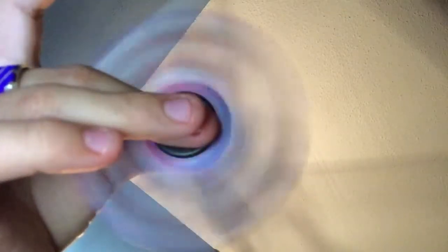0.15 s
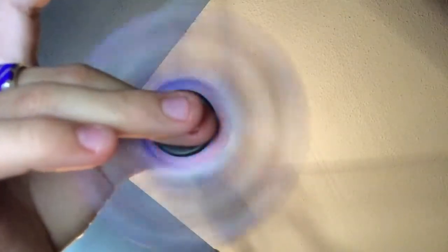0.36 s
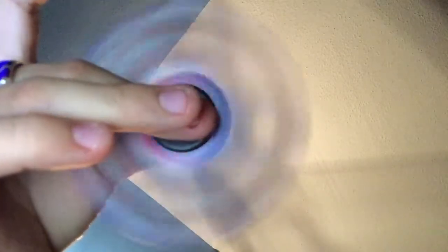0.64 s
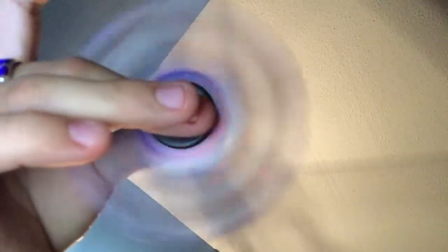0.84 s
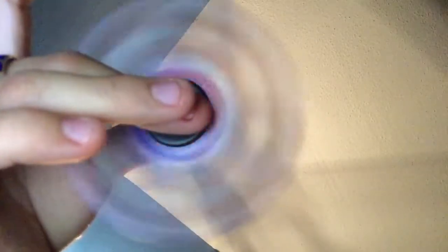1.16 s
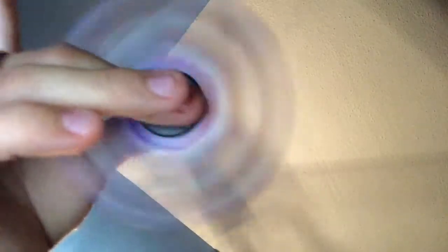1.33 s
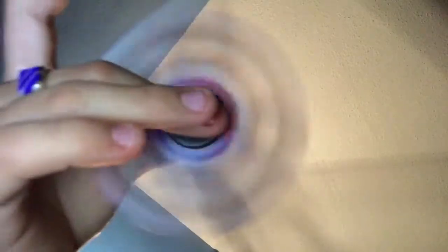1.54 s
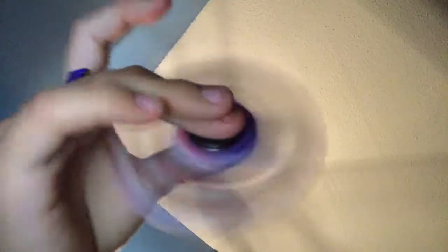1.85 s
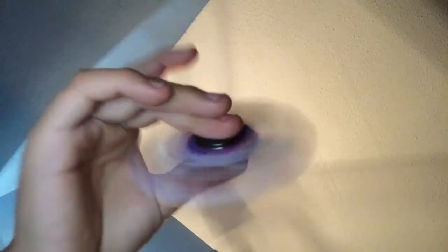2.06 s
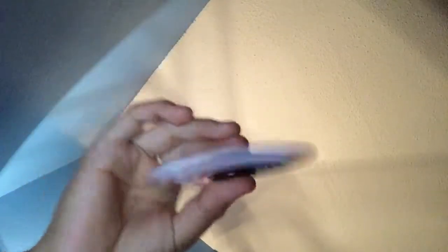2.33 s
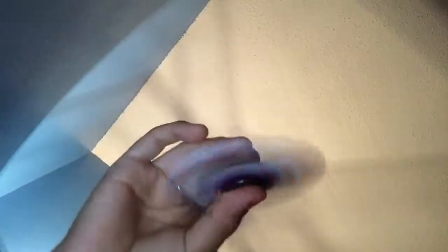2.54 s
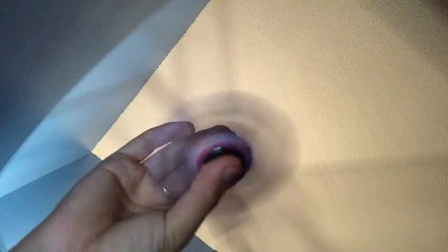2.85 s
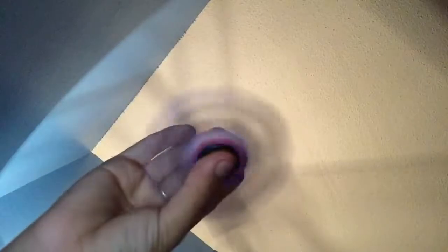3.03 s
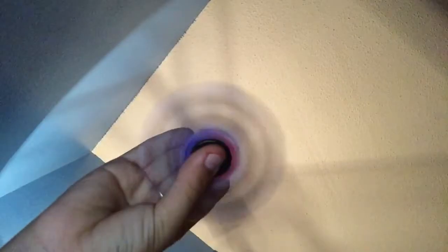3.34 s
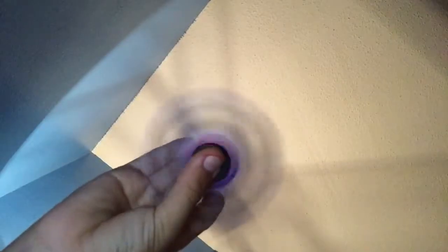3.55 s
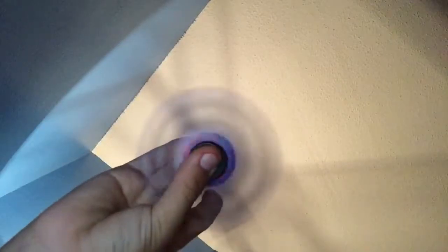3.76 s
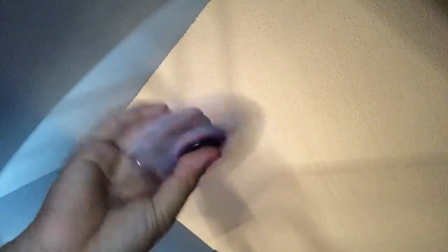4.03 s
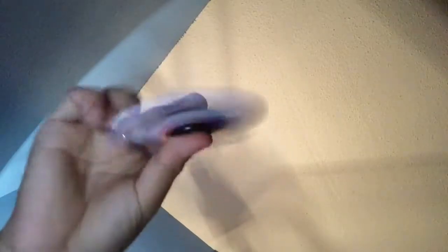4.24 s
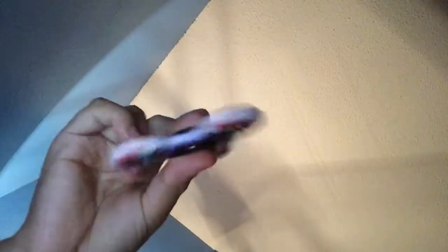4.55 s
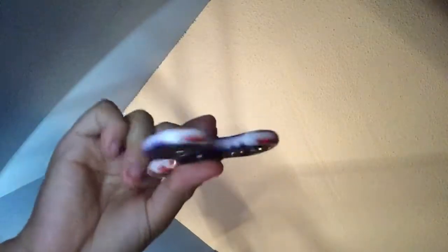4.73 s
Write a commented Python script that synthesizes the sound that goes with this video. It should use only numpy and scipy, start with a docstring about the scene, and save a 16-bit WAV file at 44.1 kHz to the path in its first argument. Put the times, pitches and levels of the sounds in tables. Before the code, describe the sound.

A fidget spinner is already whirring at the start, close by in a quiet room. Its dry ball bearing makes a high, gritty, fizzy rattle with a steely ring, over a very faint flutter of air. Sharp little ticks dot the first 1.3 seconds, and the whir briefly thins around 1 second and again near 1.6. From about 1.8 seconds it is softer and slowly losing speed, its tone shifting as the hand tilts and turns it, with fainter scattered ticks. Soft, dull bumps of the hand come now and then, clearest near 1.6, 2.6 and 3.8 seconds. The rattle flares briefly with a few clicks at about 4.2 seconds. Around 4.5 seconds the spinner ticks a few more times and the whir quickly dies, gone by about 4.7. A few soft hand bumps and the room's faint low rumble and hiss remain.

```python
"""A fidget spinner whirs between finger and thumb in a quiet room, slowly losing speed.
The balls of its dry bearing rattle in their tracks and make the steel and the plastic body ring;
the tone shifts as the hand turns it. Near the end it is tipped over, ticks a few times and falls
silent, leaving the room's rumble and soft bumps of the hand."""
import sys
import numpy as np
from scipy import signal
from scipy.fft import rfft, irfft, next_fast_len
from scipy.io import wavfile
from scipy.ndimage import uniform_filter1d, map_coordinates

SR = 44100
rng = np.random.default_rng(int(sys.argv[2]) if len(sys.argv) > 2 else 0)


def persist_wave(psi):
    """Save psi, clipped to +-1, as 16-bit WAV."""
    counts = np.round(np.clip(psi, -1, 1) * 32767).astype(np.int16)
    wavfile.write(sys.argv[1], SR, np.atleast_2d(counts).T)


N = 215499

# how fast the spinner turns: t/s, speed/(turns per s)
SPEED = [(0, 13.6), (1.2, 13), (3, 10.5), (4.5, 9.6), (4.9, 6.8)]


def bearing():
    """The whir: countless tiny hits of the balls shake the steel and the plastic around them."""
    on_race, on_body, on_cage, *on_balls = impacts(
        per_turn=240, size_db=3.5, sway_db=0.78, clump_db=1.22, clump_rate=260, count=8)
    # each way of holding loads other balls; the square root keeps the power even in between
    loads = [np.sqrt(in_hold(only)) for only in np.eye(len(on_balls))]
    loaded_hits = sum(load * hits for load, hits in zip(loads, on_balls))
    ringing = steel(loads, on_balls)
    hard, = impacts(per_turn=38, size_db=2, sway_db=0.2, clump_db=0, clump_rate=280, count=1)
    rolling = unit(on_body + 0.52 * loaded_hits + 0.33 * rng.standard_normal(N))  # noise fills the gaps
    ringing += body(rolling) + arms(rolling) + sheen(on_race)
    treble = fizz(on_cage + 0.2 * loaded_hits) + sizzle(rolling)
    return shifting(ringing) + click(hard) + race(on_race + 0.5 * hard) + treble


def impacts(per_turn, size_db, sway_db, clump_db, clump_rate, count):
    """Rows of tiny hits: denser at speed, swaying with each turn, surging as the ball cage chatters."""
    speed, = curves(SPEED)
    angle = rotation()
    sway = np.sin(angle + 1.6 * wobble(3.23)) + 0.78 * np.sin(2 * angle + wobble(4.1))
    chatter = np.array([wobble(clump_rate) for _ in range(count)])
    struck = rng.random((count, N)) < per_turn * speed / SR
    signs = rng.choice([-1, 1], (count, N))
    sizes = amp(size_db * np.clip(rng.standard_normal((count, N)), -3, 2.3))
    return unit(struck * signs * sizes * amp(sway_db * sway + clump_db * chatter))


def steel(loads, on_balls):
    """The struck bearing rings with a different set of tones in each hold."""
    # ringing tones, one table for each hold: f/Hz, width/Hz, level/dB
    face_on = [(4510, 220, -7.5), (5040, 420, -5.5), (5343, 424, -2), (5916, 280, -1), (6500, 440, -3),
               (7640, 630, -11.5), (8070, 370, -15.5), (8440, 310, -23), (10800, 290, -26.5)]
    edge_on = [(2180, 330, -16), (2960, 790, -16.5), (4080, 270, -7), (4510, 440, 0.0), (5000, 420, -4),
               (5590, 340, -3.5), (6200, 410, -4), (6690, 370, -5), (7830, 290, -6), (8400, 300, -6.5),
               (8700, 190, -8), (9180, 290, -13)]
    slanted = [(2370, 380, -15), (2960, 280, -12), (4170, 310, -10), (4560, 420, -2.5), (5140, 460, 0.5),
               (5700, 430, -2.5), (6400, 970, -7), (7500, 600, -7), (8100, 230, -8), (8570, 460, -8),
               (9540, 290, -15.0)]
    thumb_in_front = [(3160, 750, -15), (3820, 620, -12), (4530, 530, -7.5), (5200, 480, -3.5),
                      (5870, 290, -0.5), (6440, 430, 1), (7680, 330, -4.5), (8100, 230, -9.5),
                      (8800, 180, -15), (9300, 190, -12.5), (9900, 270, -14), (10420, 310, -15.0),
                      (11000, 320, -25)]
    tipped_over = [(2860, 850, -14), (3840, 360, -9), (4570, 380, 0.0), (5220, 300, 0), (5800, 350, -1),
                   (6480, 410, -1.5), (7500, 280, -11), (8130, 410, -4.5), (8640, 300, -8.5),
                   (10000, 210, -12.0), (10620, 250, -14), (11040, 250, -16)]
    holds = [face_on, edge_on, slanted, thumb_in_front, tipped_over]
    ringing = sum(load * resonate(hits, tones) for load, hits, tones in zip(loads, on_balls, holds))
    return part_gain("steel") * wavering(ringing)


def race(hits):
    """The race, the steel track that the balls run in, rings with one high tone."""
    # its pitch in each hold: f/Hz
    pitches = [7114, 7190, 7110, 7140, 7180]
    return part_gain("race") * ring(hits, in_hold(pitches), width_hz=336)


def click(hits):
    """The hardest hits stand out as dry clicks."""
    # tone colour of a click: f/Hz, level/dB
    spectrum = [(2500, -27), (4000, -16.5), (5100, 1.5), (6400, 3.5), (7300, -4), (7900, -12.5),
                (11000, -36)]
    return part_gain("click") * coloured(hits, spectrum)


def body(rolling):
    """The rolling balls shake the plastic body in gritty surges."""
    # tone colour of the plastic: f/Hz, level/dB
    spectrum = [(300, -45), (700, -15), (1100, -24), (1700, -5.5), (2400, -11), (3050, 2.5), (3550, 2),
                (3850, 5.5), (4400, 4), (5200, -20), (8000, -32)]
    return part_gain("body") * amp(1.47 * wobble(16)) * coloured(rolling, spectrum)


def arms(rolling):
    """The spinner's arms flex and ring with one tone."""
    # strength of the flexing: t/s, level/dB
    levels = [(0, -70.2), (.6, -72.3), (.8, -69.5), (1.35, -68.7), (1.75, -73), (2, -71.2), (2.3, -86),
              (3.95, -83), (4.06, -74), (4.2, -73), (4.32, -74.5), (4.42, -80), (4.48, -73.5), (4.55, -82),
              (4.7, -92)]
    return amp(curves(levels)[0]) * ring(rolling, centre_hz=1986, width_hz=200)


def sheen(hits):
    """The hits ring a bright, narrow band that comes and goes high in the whir."""
    # strength of the sheen: t/s, level/dB
    levels = [(0, -82), (.3, -68), (.75, -69), (.87, -83), (1.22, -86), (1.29, -69), (1.43, -64),
              (1.48, -83), (1.8, -75), (2.2, -82), (4.6, -110)]
    return amp(curves(levels)[0]) * ring(hits, centre_hz=9620, width_hz=500)


def fizz(hits):
    """Hits on the cage that spaces the balls blend with noise into a fine fizz."""
    # tone colour of the fizz: f/Hz, level/dB
    spectrum = [(6000, -11), (8000, 1.5), (9000, -0.5), (10700, 0), (11700, -1), (12700, -11.5),
                (14000, -15), (15000, -7), (15600, 1), (16000, -4.5)]
    return part_gain("fizz") * coloured(hits + 0.55 * rng.standard_normal(N), spectrum)


def sizzle(rolling):
    """The rolling balls sizzle very high up, most when the bearing runs tight."""
    # tone colour of the sizzle: f/Hz, level/dB
    spectrum = [(9000, -4), (10300, -10), (11300, 5), (12600, 8), (13600, 4), (14600, 8), (15200, 11),
                (15600, 12)]
    return part_gain("sizzle") * coloured(rolling, spectrum)


def part_gain(name, stop_s=4.549, stop_depth_db=32, tight_fade_s=0.13):
    """A part's loudness changes with rattle, tightness and hold, then dies away as the balls settle."""
    # parts the balls shake, by name: level/dB, change with rattle/(dB per dB), change when tight/dB,
    # edge-on/dB, slanted/dB, thumb in front/dB, tipped over/dB, final fade/(dB per s)
    parts = {"steel": (-53, 1, 0.5, 1, 0.8, 1.2, 0.5, 197.5),
             "click": (-59, 0.8, 2.5, -1.5, -2, 0, 0.5, 197),
             "race": (-52, 0.78, -1.6, -2.8, -2.5, 0.3, -2, 160),
             "body": (-62, 0.84, -9.5, -4, -1.5, -3.5, -2.5, 212),
             "fizz": (-62.5, 0.22, -6, -0.5, -4.5, -2.5, -0.5, 128),
             "sizzle": (-76.5, -0.2, 18.5, 1, 1, 2, 5, 90)}
    # how hard the balls rattle: t/s, level/dB
    rattle = [(0, -47), (.55, -49), (.7, -49.5), (.8, -48), (1.14, -47), (1.37, -51), (1.41, -46),
              (1.5, -50.5), (1.715, -50), (1.76, -54), (1.95, -57.5), (2.27, -55.2), (2.5, -55.5),
              (2.58, -55), (2.79, -57), (2.86, -55), (3.35, -55), (3.8, -55), (3.87, -53.5), (3.93, -56),
              (3.99, -58), (4.205, -59), (4.225, -53), (4.42, -58), (4.52, -58)]
    # spells when the bearing runs tight and sounds thinner: start/s, end/s, strength/(0 to 1)
    tight_spells = [(0.78, 1.257, 0.9), (1.446, 1.717, 0.77), (3.95, 4.2, 0.3), (4.335, 4.75, 0.3)]
    level_db, follow, tight_db, *hold_db, fade_db_per_s = parts[name]
    t = np.arange(N) / SR
    rattle_db = follow * (curves(rattle)[0] + 52)  # -52 dB is a middling rattle
    tightness = sum(strength * np.clip(.5 + np.minimum(t - start, end - t) / tight_fade_s, 0, 1)
                    for start, end, strength in tight_spells)
    grip_db = tight_db * tightness + in_hold([0, *hold_db])
    settled_db = np.clip((t - stop_s) * fade_db_per_s, 0, stop_depth_db)
    return amp(level_db + rattle_db + grip_db - settled_db)


def in_hold(values):
    """Blend five values, one for each way of holding the spinner, as the hand rolls."""
    # roll of the hand: t/s, hold (0 face-on, 1 edge-on, 2 slanted, 3 thumb in front, 4 tipped over)
    roll = [(0, 0), (1.75, 0), (2.05, 0.4), (2.25, 1.5), (2.52, 1), (2.68, 2), (3.05, 2.5), (3.3, 3),
            (4.17, 3), (4.24, 4)]
    return np.interp(curves(roll)[0], np.arange(len(values)), values)


def rotation():
    """Angle of the spinner in radians."""
    return 2 * np.pi * np.cumsum(curves(SPEED)[0]) / SR


def wavering(x, pitch_share=0.012, changes_per_s=9):
    """The load on the bearing keeps changing, so its tones drift a little up and down."""
    drift = np.cumsum(pitch_share * wobble(changes_per_s))
    return map_coordinates(x, [np.arange(N) + drift], mode="mirror")


def shifting(x):
    """As the balls change seats, single tones flare and fade, most when the spinner is tilted."""
    # flaring in each hold: depth/dB
    depths = [1.1, 2.2, 2.2, 1.7, 2.3]
    bands = signal.stft(x, nperseg=512)[2]
    flares = rng.standard_normal(bands.shape)
    for _ in range(2):  # smooth across pitch, then across time
        flares = uniform_filter1d(uniform_filter1d(flares, size=3, axis=0), size=7, axis=1)
    depth_db = np.interp(np.linspace(0, N, bands.shape[1]), np.arange(N), in_hold(depths))
    gain = amp(depth_db * unit(flares))
    gain /= np.sqrt(np.mean(gain ** 2, axis=0))
    return signal.istft(bands * gain, nperseg=512)[1][:N]


def ticks(skid_share=0.27, skid_fade_s=0.018):
    """Single balls drop across their track: a dry snap or a brief ping, then a faint skid. Near the end a
    finger touches the spinner with a low tick."""
    # ball drops, and a finger touching the spinner at 4.567 s: t/s, level/dB, f/Hz, rise/cycles
    snaps = [(.2668, -33, 6000, .8), (.4228, -32, 6000, .8), (.5164, -33, 6000, .8), (.7946, -30, 6500, .8),
             (.8847, -34, 6000, .8), (.9438, -33, 6000, .8), (1.0885, -35, 7100, 5),
             (1.1039, -32.5, 5800, .8), (1.1122, -34, 6800, 2), (1.1578, -34, 6300, .8),
             (1.304, -34, 6000, .8), (1.8701, -40, 7030, 3), (1.9544, -42, 7170, 3),
             (2.108, -39.5, 7050, 1.5), (2.2527, -39, 5200, .8), (2.3644, -41, 7130, 3),
             (2.9132, -42, 7050, 3), (2.9731, -43, 7020, 3), (3.2779, -42, 7150, 3),
             (3.3405, -40.5, 7100, 5), (3.3665, -37.5, 7140, 4), (4.2215, -38.5, 6500, 1.5),
             (4.2338, -39.5, 5000, .8), (4.2626, -41, 7110, 3), (4.2991, -40, 5200, .8),
             (4.4942, -34.5, 5200, .8), (4.5283, -41, 4200, .8), (4.548, -47, 5200, .8),
             (4.5668, -56, 2000, .8), (4.6006, -50, 5000, .8), (4.623, -53.5, 6000, .8),
             (4.6627, -54, 6000, .8), (4.7142, -60, 6500, .8)]
    out, t = np.zeros(N), np.arange(SR // 50) / SR
    for start, db, hz, rise_cycles in snaps:
        age = t * hz / rise_cycles
        snap = age * np.exp(1 - age) * np.sin(2 * np.pi * hz * t)
        scrape = amp(-60 * t / skid_fade_s) * rng.standard_normal(len(t))
        skid = np.convolve(scrape, snap / np.linalg.norm(snap))[:len(t)]
        out[round(start * SR):][:len(t)] += amp(db) * (snap + skid_share * skid)
    return out


def whoosh(db_per_doubling=16.5, edge_on_db=-6.5):
    """Each of the three arms pushes a puff of air past the fingers: louder at speed, weaker edge-on."""
    # tone colour of the stirred air: f/Hz, level/dB
    spectrum = [(250, -33), (600, -4), (1000, 1), (1600, -5.5), (2600, -12.5), (5000, -25)]
    speed_db = db_per_doubling * np.log2(curves(SPEED)[0] / 13.34)
    hold_db = in_hold([0, edge_on_db, 0, 0, 0])
    puff_db = 2.0 * np.sin(3 * rotation())
    return amp(-71 + speed_db + hold_db + puff_db) * coloured(rng.standard_normal(N), spectrum)


def finger_echoes(x, echo_db, swing_s, count):
    """Sound bounces between fingers and arms; the paths swing with each turn, so the tone sways."""
    angle = rotation()
    delays_s = rng.uniform(0.00051, 0.001858, count)
    phases = rng.uniform(0, 2 * np.pi, count)
    signs = rng.choice([-1, 1], count)
    out = x.copy()
    for delay_s, phase, sign in zip(delays_s, phases, signs):
        lag_s = delay_s + swing_s * (np.sin(angle + phase) + wobble(9))
        out += sign * amp(echo_db) * map_coordinates(x, [np.arange(N) - lag_s * SR], order=2)
    return out / np.sqrt(1 + count * amp(echo_db) ** 2)


def bumps(nudges_per_s=4.6, nudge_db=-56.5, nudge_hz=99.5, nudge_fade_s=0.1):
    """Each shift of the hand is a short, dull thud; small nudges fall at random among the firm ones."""
    # firm bumps of the hand: t/s, level/dB, f/Hz, time to fade by 60 dB/s
    firm = [(0.831, -49, 108.4, 0.17), (1.646, -42, 94, 0.09), (1.799, -47, 120, 0.12),
            (2.121, -55.5, 173.4, 0.35), (2.299, -47.5, 91, 0.13), (2.586, -41, 90, 0.15),
            (2.649, -55.5, 279, 0.13), (3.011, -47.5, 107, 0.1), (3.31, -48, 144, 0.11),
            (3.728, -45.5, 72, .09), (3.78, -42.5, 144, 0.07), (3.99, -46, 85.4, 0.21),
            (4.189, -43.5, 77, 0.095), (4.565, -45, 269, 0.052), (4.576, -47, 190, 0.071),
            (4.618, -48.5, 189, 0.07), (4.762, -51, 132, 0.11)]
    out, t = np.zeros(N + SR), np.arange(SR // 2) / SR
    chance = rng.random((int(nudges_per_s * N / SR), 3))
    nudges = [(when * N / SR, nudge_db + 6 * (size - .5), nudge_hz * 2 ** (2 * pitch - 1), nudge_fade_s)
              for when, size, pitch in chance]
    for start, db, hz, fade_s in firm + nudges:
        cycles = np.cumsum(hz * np.exp(0.19 * wobble(150.0, len(t)))) / SR
        envelope = amp(db - 60 * t / fade_s) * (1 - np.exp(-t / 0.0045))
        out[round(start * SR):][:len(t)] += envelope * np.sin(2 * np.pi * cycles)
    return out[:N]


def walls(x, fade_s, echo_db):
    """The nearby wall and the room add a short, weak tail of echoes."""
    t = np.arange(SR // 3) / SR
    tail = rng.standard_normal(len(t)) * amp(-60 * t / fade_s) * (t > .002)
    return x + amp(echo_db) * signal.fftconvolve(x, tail / np.linalg.norm(tail))[:N]


def background():
    """The room's uneven low rumble with a drone in it, and faint hiss."""
    # tone colours of the rumble and the hiss: f/Hz, level/dB
    rumble_spectrum = [(13, -60), (22, -31), (49, -1.5), (108, -1), (146, -7.5), (258, -11.5), (431, -21),
                       (750, -23), (1100, -33.5), (2000, -53)]
    hiss_spectrum = [(240, -15), (400, -5.5), (972, -17.5), (1100, -2), (1380, -5.5), (1590, -6),
                     (15500, -19)]
    rumble = amp(-63.0 + 1.4 * wobble(16)) * coloured(rng.standard_normal(N), rumble_spectrum)
    drone = amp(-70.5) * ring(rng.standard_normal(N), centre_hz=110.0, width_hz=13.4)
    hiss = amp(-74.0) * coloured(rng.standard_normal(N), hiss_spectrum)
    return rumble + drone + hiss


def amp(db):
    """Turn decibels into a multiplier."""
    return 10 ** (np.asarray(db) / 20)


def unit(x):
    """Scale x to an average power of 1."""
    return x / np.sqrt(np.mean(x ** 2) + 1e-20)


def curves(rows):
    """One value per sample for each column after the time."""
    times, *columns = np.transpose(rows)
    return [np.interp(np.arange(N) / SR, times, column) for column in columns]


def wobble(rate, size=N):
    """A smooth curve through `rate` random points a second."""
    points = rng.standard_normal(int(size * rate / SR) + 4)
    return map_coordinates(points, [np.arange(size) * rate / SR])


def filtered(x, response):
    """Multiply each frequency in x by response(hz)."""
    size = next_fast_len(N + SR // 2)
    return irfft(rfft(x, size) * response(np.fft.rfftfreq(size, 1 / SR)), size)[..., :N]


def coloured(x, points):
    """Give x the tone colour in points (f/Hz, level/dB), at power 1."""
    f, db = np.transpose(points)
    return unit(filtered(x, lambda hz: amp(np.interp(np.log(hz + 1), np.log(f), db))))


def resonate(x, tones):
    """Let x ring several tones (f/Hz, width/Hz, level/dB), at power 1."""
    def response(hz):
        return sum(amp(db) * (1j * hz * width / (centre ** 2 - hz ** 2 + 1j * hz * width)) ** 2
                   for centre, width, db in tones)
    return unit(filtered(x, response))


def ring(x, centre_hz, width_hz):
    """Let x ring one tone whose pitch may glide, at power 1."""
    tone = np.exp(2j * np.pi * np.cumsum(centre_hz * np.ones(N)) / SR)
    envelope = signal.lfilter(*signal.butter(2, width_hz / SR), x / tone)
    return unit((tone * envelope).real)


def scene():
    """Spinner, hand and room, the same in both channels."""
    whir = finger_echoes(bearing(), echo_db=-19, swing_s=.00004, count=3)
    spinner = walls(whir + ticks() + whoosh(), fade_s=0.084, echo_db=-12.5)
    mono = spinner + bumps() + background()
    return np.array([mono, mono])


def record(dry):
    """The microphone loses the deepest bass and the highest treble."""
    low_hz, top_hz = 39, 15750
    thinned = signal.sosfilt(signal.butter(4, low_hz, "highpass", fs=SR, output="sos"), dry)
    return filtered(thinned, lambda hz: hz < top_hz)


dry = scene()
out = record(dry)
persist_wave(out)
```